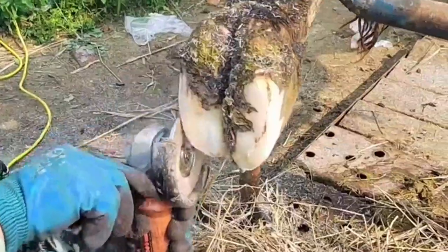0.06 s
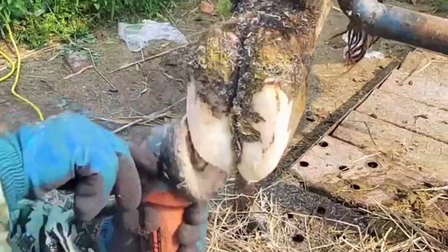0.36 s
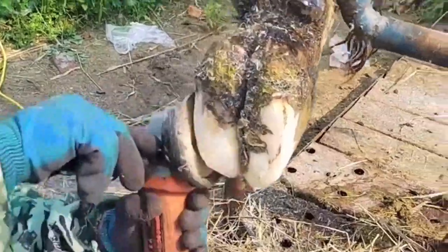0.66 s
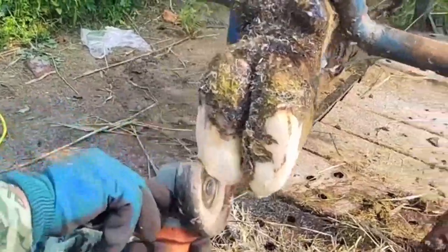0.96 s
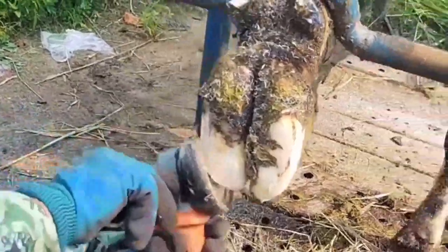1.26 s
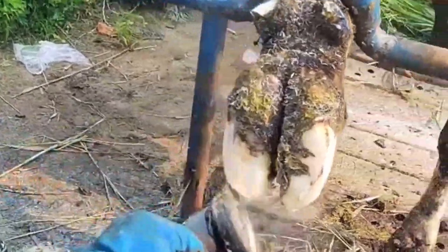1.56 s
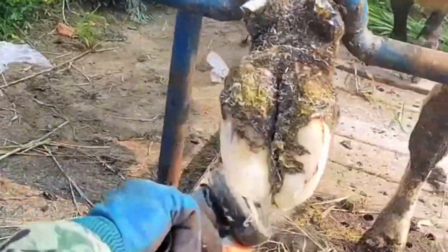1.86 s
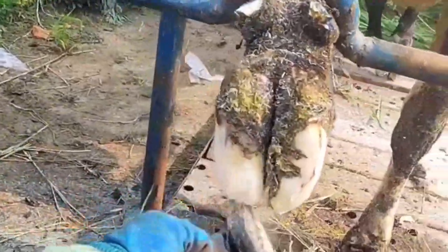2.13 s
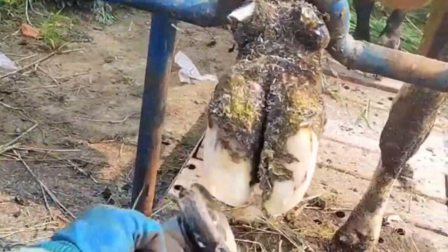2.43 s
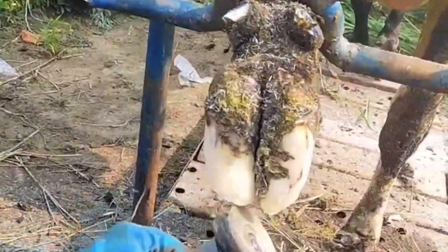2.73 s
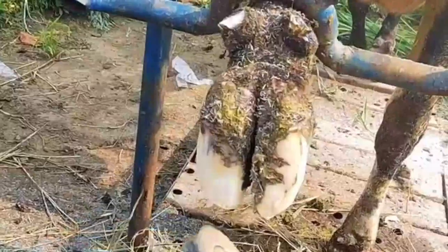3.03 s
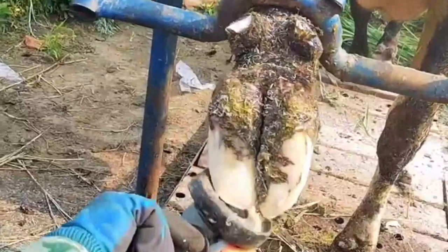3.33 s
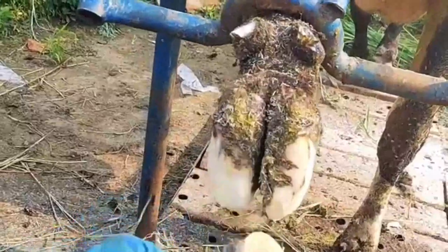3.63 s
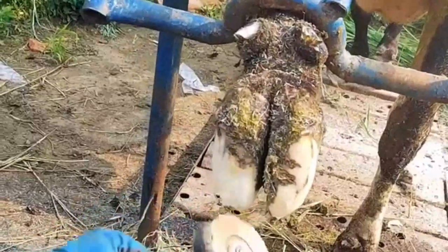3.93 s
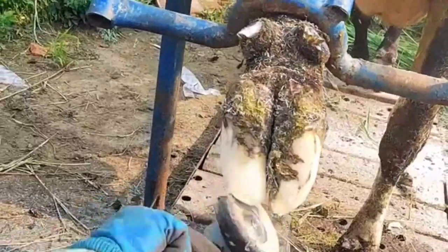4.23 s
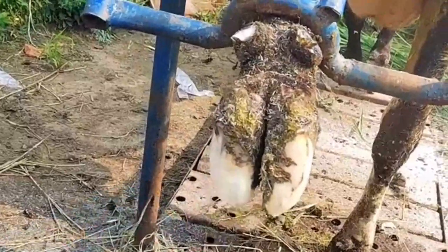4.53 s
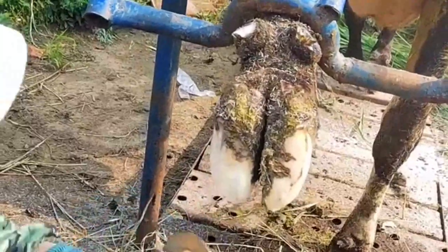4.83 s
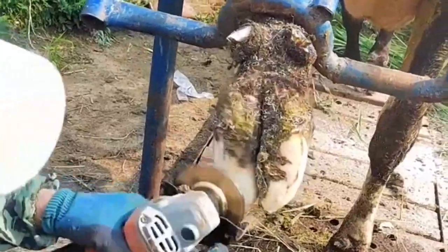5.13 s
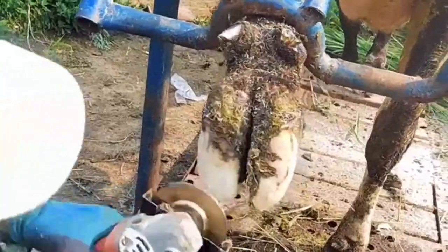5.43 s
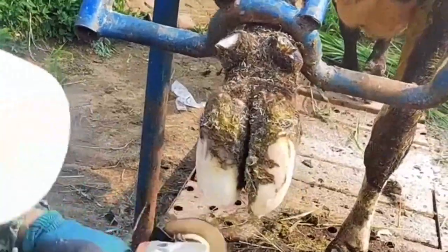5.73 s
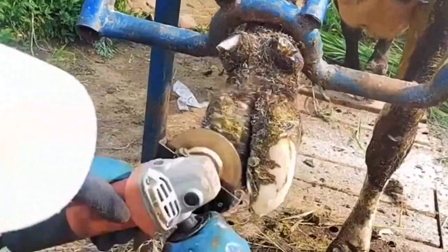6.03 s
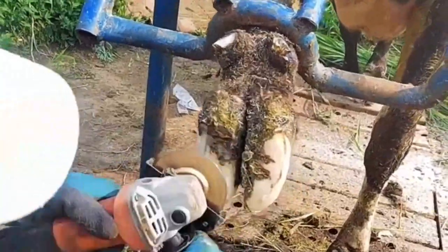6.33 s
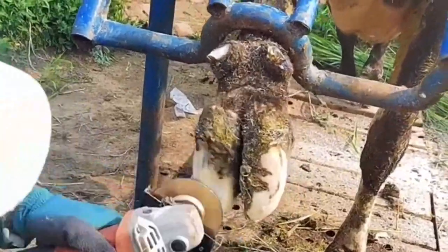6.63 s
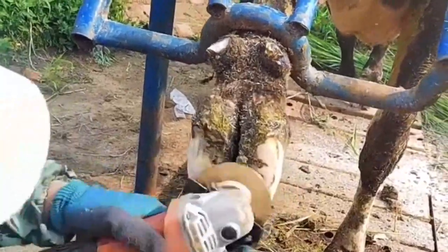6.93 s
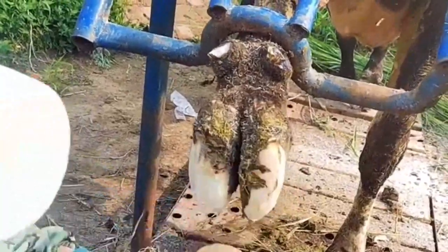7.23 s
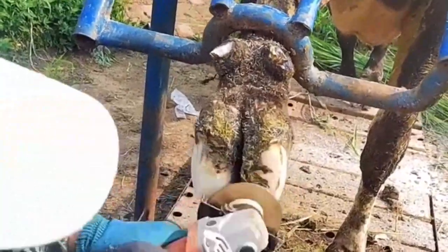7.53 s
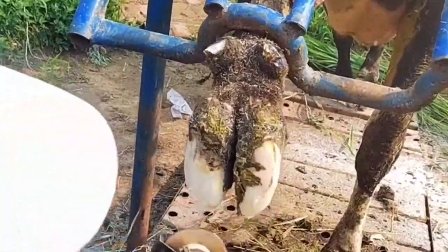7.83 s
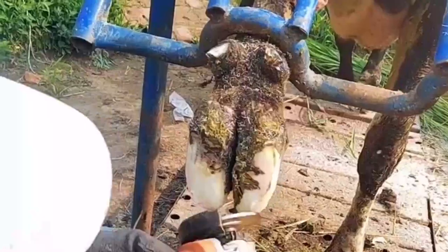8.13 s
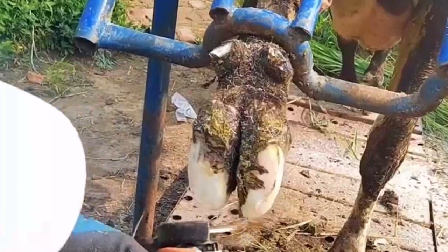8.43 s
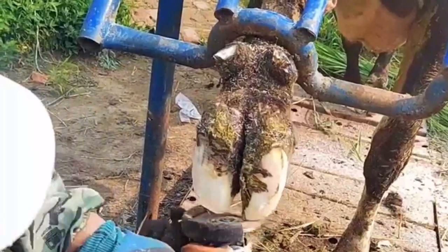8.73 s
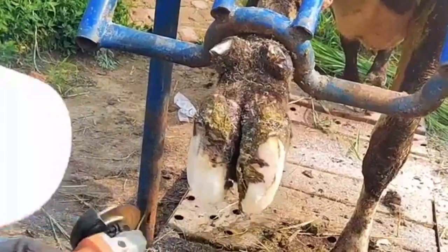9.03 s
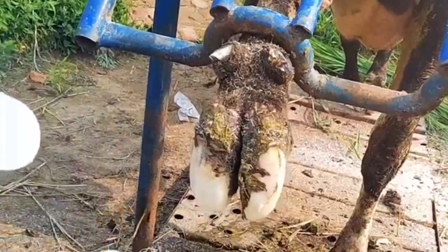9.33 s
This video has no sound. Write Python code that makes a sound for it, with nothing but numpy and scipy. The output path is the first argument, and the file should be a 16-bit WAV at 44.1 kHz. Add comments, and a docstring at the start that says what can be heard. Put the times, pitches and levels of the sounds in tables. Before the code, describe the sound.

Close to a single microphone in the open air, an angle grinder trims a cow's hoof without stopping. A grainy rasp and rushing fan carry a wavering motor whine that drops whenever the disc presses into the horn, bringing harsher gear rattle and hiss. Short metallic squeals come and go. Past the middle come thin, very high squeaks and several light knocks of breaking chips. There is no echo.

```python
"""An angle grinder with a toothed disc pares a cow's hoof, outdoors, close to a single microphone.
The teeth rasp and hiss through horn, and the motor sags at each bite and climbs as the disc lifts.
Its fan rushes and sings; its bevel gears rattle, and whine under load. Now and then the steel rim
sticks and squeals, or a hard chip tears off with a knock. The open air gives no echo."""
import sys
import numpy as np
from scipy import signal
from scipy.fft import rfft, irfft, next_fast_len
from scipy.io import wavfile
from scipy.ndimage import uniform_filter1d, map_coordinates

SR = 44100
rng = np.random.default_rng(int(sys.argv[2]) if len(sys.argv) > 2 else 0)


def log_audio(samples):
    """Write samples as a 16-bit WAV file to the path given in sys.argv[1]."""
    # one column per channel
    frames = np.atleast_2d(samples).T
    # limit to full scale, then quantise
    limited = np.clip(frames, -1, 1)
    pcm = np.round(limited * 32767).astype(np.int16)
    wavfile.write(sys.argv[1], SR, pcm)


N = 417186
TIME = np.arange(N) / SR
GEAR_RATIO, PINION_TEETH, ARMATURE_SLOTS = 3.6, 10, 12
MAINS_HZ = 50
TURN_OVER_S = 5.15  # the disc goes from working with its face to working with its edge

# The disc is pressed into the horn. Each row: start in seconds, length in seconds, dip of the
# recorded level in dB, extra gear rattle in dB, extra hiss in dB.
BITES = [(0.046, 0.17, 8, 1, -1), (0.451, 0.12, 7.5, 4, 2.5), (0.88, 0.12, 10.5, 12.5, 5.5),
         (1.035, 0.14, 3, 6, 0.5), (1.416, 0.21, 7, 13, 9), (1.926, 0.25, 5, 11, 4),
         (2.682, 0.16, 7, 8.5, 4), (3.548, 0.13, 9, 5, 4.5), (4.197, 0.28, 5, 5, 3.5),
         (5.13, 0.034, 9, -7, 9), (5.626, 0.21, 4, 6, 1), (6.055, 0.24, 5, 3.5, 3), (6.47, 0.17, 2.5, 2, 4),
         (7.081, 0.14, 4.5, 11, 4), (7.564, 0.12, 4.5, 9, 7), (8.14, 0.21, 3.5, 8.5, 1)]
# How the tool is held between bites. Each row: time in seconds, then base levels in dB of the
# rush of air and rasp, the gear rattle and the hiss of the cut.
GRIP = [(0, -21.5, -20.5, -23.5), (.8, -20.5, -21.5, -26), (1.35, -20, -22, -31), (2.4, -22, -19.5, -31),
        (3.3, -19.5, -25, -28), (4.5, -20.5, -21, -29.5), (5.1, -19.5, -24, -26), (5.25, -24.5, -19.5, -28),
        (6.3, -19.5, -22, -26), (6.75, -24, -23, -27.5), (6.77, -19, -20, -29.5), (7.1, -21.5, -21, -29),
        (7.9, -25.5, -18, -31), (8.2, -23, -21, -25.5), (8.65, -30, -17.5, -35.5),
        (9.05, -29.5, -18.5, -34), (9.46, -18.5, -28, -28.5)]
# Air and rasp with the disc on its face. Each row: frequency in Hz, spectral level in dB.
FACE_SPECTRUM = [(200, -20.5), (300, -5.5), (620, -6.5), (900, -1), (1550, -1), (2200, 4), (3000, 4),
                 (3800, 2), (6300, -6), (12000, -15)]
# Air and rasp with the disc on its edge. Each row: frequency in Hz, spectral level in dB.
EDGE_SPECTRUM = [(210, -18), (400, -9), (800, -0.5), (1700, 0.5), (2800, 3.5), (3600, -2), (6300, -8.5),
                 (12000, -18)]
# The rasp's upper band. Each row: time in seconds, lift in dB.
UPPER_RASP = [(.8, -5), (1.5, 2.5), (3.4, 3), (3.9, -1), (6.2, -2), (7.5, 1.5), (8.6, 0.5)]
# The hiss of the cut. Each row: frequency in Hz, spectral level in dB.
HISS_SPECTRUM = [(2000, -8), (4000, 0.5), (6500, 9.5), (8300, 4.5), (10400, 8.5), (11200, 1.5),
                 (15700, -0.5)]
# The armature sags under the cut and recovers. Each row: time in seconds, turns per second.
ARMATURE_SPEED = [(0.0, 541.0), (0.16, 523.0), (0.38, 536.0), (0.56, 501.0), (0.86, 526.0), (0.96, 488.0),
                  (1.12, 482.0), (1.26, 514.0), (1.46, 505.0), (1.64, 466.0), (1.88, 526.0), (1.98, 522.0),
                  (2.2, 468.0), (2.56, 536.0), (2.72, 520.0), (2.8, 499.0), (3.2, 559.0), (3.48, 551.0),
                  (3.64, 520.0), (4.02, 568.0), (4.22, 567.0), (4.38, 529.0), (4.84, 579.0), (5.14, 595.0),
                  (5.28, 522.0), (5.58, 559.0), (5.76, 493.0), (6.04, 546.0), (6.28, 463.0), (6.42, 495.0),
                  (6.74, 458.0), (6.92, 470.0), (7.06, 510.0), (7.15, 490.0), (7.23, 448.0), (7.46, 509.0),
                  (7.59, 527.0), (7.72, 450.0), (7.9, 510.0), (8.12, 535.0), (8.36, 496.0), (8.68, 545.0),
                  (8.88, 551.0), (8.96, 519.0), (9.06, 540.0), (9.46, 578.0)]
# The motor at the microphone as the tool turns in the hand. Each row: time in seconds, then base
# levels in dB of the fan tones, the slot whine and the unbalance hum.
MOTOR_LEVELS = [(0, -34, -44, -44), (.35, -19.5, -32, -52.5), (.6, -28, -27.5, -54),
                (1.3, -25.5, -22.5, -61), (2.4, -28.5, -37, -56), (3.3, -26, -23.5, -49),
                (4, -26.5, -29, -54.5), (5.1, -21, -31, -40), (5.22, -30, -33, -46.5),
                (7.15, -31, -36, -52.5), (7.33, -23, -36, -49), (8.7, -42, -29, -70), (9.46, -23, -29, -45)]
# The fan's tones. Each row: multiple of the armature speed, relative level in dB.
FAN_TONES = [(2, -9), (4, -0.5), (5, -6.5)]
# The motor's buzz under power. Each row: frequency in Hz, spectral level in dB.
BUZZ_SPECTRUM = [(1500, -4.5), (3000, 1), (4300, 14.5), (5200, -3), (8000, 10), (11000, -31), (12700, -15)]
# The crack of slack gear teeth. Each row: frequency in Hz, spectral level in dB.
CRACK_SPECTRUM = [(2000, -17), (4100, -7), (4700, -9), (5200, -4), (5800, 16), (6600, -2), (11500, -28),
                  (13000, 3), (15000, -18)]
# Modes of the steel disc. Each row: frequency in Hz, level of the steady ringing in dB.
DISC_MODES = [(2718, -32), (3262, -47), (5575, -32), (6424, -37), (8788, -50)]
# The rubbing rim locks onto one mode. Each row: peak time in seconds, row of DISC_MODES from 0,
# level in dB, half length in seconds.
SQUEALS = [(0.008, 1, -19.5, 0.08), (0.11, 3, -20, 0.059), (0.146, 4, -19, 0.059), (0.41, 3, -22, 0.14),
           (0.503, 2, -18, .025), (0.56, 0, -24, 0.091), (0.67, 1, -24, 0.044), (0.85, 0, -20, 0.039),
           (.90, 3, -19, 0.028), (0.957, 2, -13.5, 0.027), (0.987, 0, -29, 0.06), (1.286, 2, -16.5, 0.035),
           (1.51, 0, -22.5, 0.029), (2.156, 0, -17, 0.053), (2.76, 2, -14.5, 0.028),
           (3.598, 4, -22.5, 0.072), (3.603, 3, -14.5, 0.031), (4.29, 3, -14, 0.027),
           (4.358, 2, -16, 0.025), (5.21, 1, -26.5, 0.04), (6.155, 2, -21, 0.013), (6.252, 0, -17.5, 0.01),
           (6.32, 2, -25, 0.08), (6.35, 0, -25.5, 0.089), (6.495, 2, -19, 0.027), (8.36, 3, -22.5, 0.097),
           (8.88, 3, -13, 0.026), (8.886, 1, -24, 0.032), (8.964, 2, -18, 0.051)]
# Shrill resonances of the rim. Each row: frequency in Hz, relative level in dB.
RIM_MODES = [(7350, -6.5), (9000, -8.5)]
# Scrapes on hard horn. Each row: peak time in seconds, centre in Hz, level in dB,
# half length in seconds.
SCRAPES = [(.48, 9500, -20, 0.054), (.68, 8950, -19.5, 0.043), (1.61, 10400, -18.5, 0.011),
           (2.72, 9250, -21.5, 0.032), (4.83, 7440, -24, 0.21), (4.93, 11500, -28, 0.06),
           (4.95, 6260, -24, 0.13), (5.71, 9100, -21, 0.041), (6.3, 14800, -26, 0.054),
           (6.52, 15150, -21, 0.06), (6.86, 7260, -18.5, 0.047), (7.41, 7300, -25, 0.092)]
# The teeth chatter in a squawk. Each row: peak time in seconds, centre in Hz, level in dB,
# half length in seconds.
SQUAWKS = [(6.27, 4690, -19, 0.014), (6.72, 4030, -21, 0.029), (8.325, 5050, -16, 0.027)]
# The edge tears off a hard chip. Each row: start in seconds, centre in Hz, level in dB.
CHIPS = [(5.61, 1500, -16), (6.208, 1190, -16.5), (6.58, 1082, -16), (6.762, 1000, -22), (6.772, 2600, -11),
         (7.087, 1330, -15)]
# The hoof's hollow resonance shifts with the spot being cut. Each row: time in seconds,
# centre in Hz, relative level in dB.
HOOF_RESONANCE = [(0, 813, -8), (2.4, 814.3, -12.5), (3.2, 903, -24), (5.5, 965, -9.5)]
# Soft low bumps. Each row: peak time in seconds, centre in Hz, level in dB, half length in seconds.
BUMPS = [(.03, 120, -33.5, 0.037), (1.19, 225, -32, 0.073)]


def rasp(turns, spectrum, grain_db, chop_db):
    """Teeth tear off chips in fine uneven grains, harder on one side of each turn of the disc."""
    chop = np.sin(2 * np.pi * turns / GEAR_RATIO + 0.42 * walk(36))
    grains = noise() * undb(grain_db * walk(1500) + chop_db * chop + 1.24 * walk(60))
    return colour(grains, spectrum)


def horn_rasp(turns, upper_band_hz=(3350, 4500)):
    """The disc rasps with its face, then its edge; the upper band turns fuller or hollower."""
    face = rasp(turns, FACE_SPECTRUM, grain_db=2.0, chop_db=0.5)
    edge = rasp(turns, EDGE_SPECTRUM, grain_db=2.0, chop_db=0.5)
    body = undb(3.0) * np.where(TIME < TURN_OVER_S, face, edge)
    upper = signal.sosfilt(signal.butter(1, upper_band_hz, "bandpass", fs=SR, output="sos"), body)
    return body + (undb(curves(UPPER_RASP)[0]) - 1) * upper


def pressing(amounts_db, build_share, release_s):
    """Each bite builds to its own amount over a share of its length, holds, and lets go."""
    return sum(db * np.interp(TIME - s, [0, build_share * length, length, length + release_s],
                              [0, 1, 1, 0])
               for (s, length, *_), db in zip(BITES, amounts_db))


def gear_rattle(turns, pressure_db, gap_s=0.0073, ring_s=0.00035, scatter_db=4.5, rebound=0.81):
    """Slack teeth knock where throb, wobble and chance push hardest, and rebound one turn later."""
    push = 0.7 * (mains_throb() + np.sin(2 * np.pi * turns / GEAR_RATIO)) + walk(300)
    hits = signal.find_peaks(push, distance=1 + gap_s * SR)[0]
    rebounds = np.minimum(np.searchsorted(turns, turns[hits] + 1), N - 1)
    chance = np.clip(rng.standard_normal((len(hits), 2)), -2, 1).T
    knocks = np.zeros(N)
    knocks[hits] = undb(scatter_db * chance[0])
    knocks[rebounds] += rebound * undb(2 * scatter_db * chance[1])
    burst = signal.lfilter([1], [1, -np.exp(-1 / (ring_s * SR))], knocks)
    burst = unit(uniform_filter1d(burst, size=24))
    # pressing on the horn closes the slack, so the knocks merge into a scrape
    scrape = 0.32 * undb(0.26 * (pressure_db - np.median(pressure_db)))
    force = unit((burst + scrape) / np.hypot(1, scrape))
    # each knock is a crack and a chirp at the meshing pitch, drawn out by the gear head's resonance
    mesh = np.sin(2 * np.pi * PINION_TEETH * turns + 1.14 * walk(1000))
    chirps = resonate(force * mesh, centre_hz=5610, width_hz=3150)
    cracks = undb(-10) * force * colour(noise(), CRACK_SPECTRUM)
    return unit(chirps + cracks)


def gear_whine(turns, load, bite_db, full_bite_db=5.5):
    """The pinion sings harshly when a hard bite brakes the disc; each disc turn sways the pitch."""
    wobble = np.sin(2 * np.pi * turns / GEAR_RATIO)
    mesh = np.sin(2 * np.pi * PINION_TEETH * turns + 0.8 * wobble + 0.9 * walk(700))
    braking = load * np.clip(bite_db / full_bite_db, 0, 1)
    return unit(mesh * undb(2.8 * walk(200))) * undb(-22 + 14 * braking ** 2)


def motor(turns, speed, pull, load, rush_db, fan_db, slot_db, housing_hz=3000):
    """Fan tones and the rough whine of the armature slots, shaken by the throbbing torque."""
    throb = mains_throb()
    angle = 2 * np.pi * turns + 0.013 * throb + 0.019 * walk(120)
    flutter = 0.082 * walk(150)
    fan = sum(undb(db + 2.9 * walk(9) + 3.0 * walk(70)) * np.sin(multiple * angle + flutter)
              for multiple, db in FAN_TONES)
    slots = undb(2.4 * walk(130) + 2.0 * throb) * np.sin(ARMATURE_SLOTS * angle + 0.31 * walk(450))
    tones = undb(fan_db - 5 + 1.6 * pull) * fan + undb(slot_db) * slots
    choke = undb(-8 * load ** 2)  # a hard bite chokes both
    # drawing current, the motor sings an octave under the slots, loudest near the housing's resonance
    housing = 1 / np.hypot(1, (ARMATURE_SLOTS / 2 * speed - housing_hz) / 230)
    strain = undb(rush_db - 14 + 8.1 * pull) * housing * np.sin(ARMATURE_SLOTS / 2 * angle)
    return np.sqrt(2) * (choke * tones + strain)


def mains_throb():
    """The torque throbs at twice the mains rate."""
    return np.sin(2 * np.pi * 2 * MAINS_HZ * TIME)


def power_buzz(pull, rush_db, sharpness=5, face_db=-5.0, edge_db=-12):
    """While the motor pulls hard, brushes and gears crackle at every crest of the mains current."""
    crest = np.exp(sharpness * (mains_throb() - 1))
    crackle = colour(noise() * crest * undb(2 * walk(60)), BUZZ_SPECTRUM)
    heard_db = rush_db + np.where(TIME < TURN_OVER_S, face_db, edge_db)
    return undb(heard_db) * np.sqrt(pull) * crackle


def squeals(tail=0.042, waver_hz=14, flutter_db=3.5):
    """Stick and slip at the rim drives one mode into a nearly pure, wavering tone that lingers."""
    waver = 2 * np.pi * np.cumsum(waver_hz * walk(130)) / SR
    flutter = np.sqrt(2) * undb(flutter_db * np.clip(walk(90), -2, 1))
    tones = np.zeros(N)
    for peak_s, mode, db, half_s in SQUEALS:
        envelope = swell(peak_s, db, half_s) + tail * swell(peak_s + half_s, db, 3 * half_s)
        tones += envelope * np.sin(2 * np.pi * DISC_MODES[round(mode)][0] * TIME + waver)
    return flutter * tones


def rim_chirps(spread_db=7.5, width_hz=650):
    """Each resonance of the rim flares up briefly on its own as the contact point wanders."""
    chirps = np.zeros(N)
    for hz, db in RIM_MODES:
        flare = undb(spread_db * np.clip(walk(16), -2, 2))
        chirps += undb(db) * unit(flare * resonate(noise(), hz, width_hz))
    return chirps


def edge_squeaks(centre_hz=14700, width_hz=1100, spread_db=8):
    """Worked on its edge, the disc gives very high squeaks that come and go."""
    flare = undb(spread_db * np.clip(walk(14), -2, 2))
    return undb(-7) * (TIME > TURN_OVER_S) * unit(flare * resonate(noise(), centre_hz, width_hz))


def noise_swells(table, width_share, flicker_db):
    """Scrapes, squawks or bumps: flickering noise swells in a band as wide as a share of its centre."""
    source = noise() * undb(flicker_db * walk(150))
    return sum(swell(peak_s, db, half_s) * resonate(source, hz, width_share * hz)
               for peak_s, hz, db, half_s in table)


def chip_knocks(decay_s=0.0087, width_share=0.67):
    """Each torn chip rings the hoof at once and dies away."""
    knocks = np.zeros(N)
    for start_s, hz, db in CHIPS:
        envelope = (TIME >= start_s) * np.exp(-np.abs(TIME - start_s) / decay_s)
        knocks += undb(db) * envelope * resonate(noise(), hz, width_share * hz)
    return knocks


def disc_ring(width_hz=46):
    """The teeth keep all the disc's modes faintly ringing."""
    return sum(undb(db + 2 * walk(19)) * resonate(noise(), hz, width_hz) for hz, db in DISC_MODES)


def hoof_ring(width_hz=200):
    """The rasping keeps the hoof humming in one broad, moving resonance."""
    hz, db = curves(HOOF_RESONANCE)
    angle = 2 * np.pi * np.cumsum(hz) / SR
    return undb(db) * unit(walk(width_hz) * np.sin(angle) + walk(width_hz) * np.cos(angle))


def unbalance(turns, db, jitter_rad, jitter_rate):
    """A rotor a little out of balance hums at its turning rate, low beneath the cut."""
    return undb(db) * unit(np.sin(2 * np.pi * turns + jitter_rad * walk(jitter_rate)))


def undb(db):
    """Decibels to gain."""
    return 10 ** (np.asarray(db) / 20)


def unit(x):
    """Scale to rms 1."""
    return x / np.sqrt(np.mean(x ** 2))


def curves(table):
    """Each column after the first as a line through time."""
    seconds, *columns = np.transpose(table)
    return [np.interp(TIME, seconds, column) for column in columns]


def noise():
    """White noise."""
    return rng.standard_normal(N)


def walk(rate):
    """Smooth chance that changes about rate times a second; rms 1."""
    steps = rng.standard_normal(N // 8)
    return unit(map_coordinates(steps, [TIME * rate], order=1, mode="wrap"))


def shape(x, gain):
    """Filter by a gain that is a function of frequency; rms 1."""
    size = next_fast_len(N)
    hz = np.arange(size // 2 + 1) * SR / size + 1e-3
    return unit(irfft(rfft(x, size) * gain(hz), size)[:N])


def colour(x, points):
    """Filter by a curve of (Hz, dB) points."""
    points_hz, db = np.transpose(points)
    return shape(x, lambda hz: undb(np.interp(np.log(hz), np.log(points_hz), db)))


def resonate(x, centre_hz, width_hz):
    """One resonance with steep skirts."""
    return shape(x, lambda hz: 1 / (1 + 1j * (hz ** 2 - centre_hz ** 2) / (hz * width_hz)) ** 2)


def swell(peak_s, db, half_s):
    """A rounded rise and fall around one moment."""
    return undb(db) / np.cosh(np.clip(1.47 * (TIME - peak_s) / half_s, -30, 30))


def scene():
    """The grinder at close range in open air, on one microphone."""
    rush_db, rattle_db, hiss_db = curves(GRIP)
    fan_db, slot_db, hum_db = curves(MOTOR_LEVELS)
    # a bite brings out gears and cut; the recorded level ducks at each bite and swells back
    _, _, dips, rattles, hisses = np.transpose(BITES)
    bite_db = pressing(rattles, build_share=0.4, release_s=0.049)
    rattle_db += bite_db
    hiss_db += pressing(hisses, build_share=0.2, release_s=0.048)
    dip_db = pressing(dips, build_share=0.84, release_s=0.14)
    speed = uniform_filter1d(curves(ARMATURE_SPEED)[0], size=1500)
    turns = np.cumsum(speed) / SR
    climb = uniform_filter1d(np.gradient(speed) * SR, size=2500)
    load = np.clip(-climb / 190, 0, 1)  # the faster the motor slows, the harder the disc bites
    pull = np.clip(climb / 220, 0, 1)  # the faster it climbs, the harder it pulls

    disc_hum = unbalance(turns / GEAR_RATIO, hum_db, jitter_rad=0.5, jitter_rate=40)
    armature_hum = unbalance(turns, rush_db - 23 + walk(7.7), jitter_rad=0.14, jitter_rate=56)
    body = horn_rasp(turns) + hoof_ring()
    gears = undb(-3.5 * load) * gear_rattle(turns, rush_db + bite_db) + gear_whine(turns, load, bite_db)
    hiss = undb(4.5) * rasp(turns, HISS_SPECTRUM, grain_db=2.5, chop_db=-1.0)
    cut = hiss + rim_chirps() + edge_squeaks()
    tool = undb(rush_db) * body + undb(rattle_db) * gears + undb(hiss_db) * cut
    tool += power_buzz(pull, rush_db) + disc_hum
    drive = motor(turns, speed, pull, load, rush_db, fan_db - dip_db, slot_db - 0.27 * dip_db)
    steel = disc_ring() + squeals()
    steel += noise_swells(SCRAPES, width_share=0.12, flicker_db=3)
    steel += noise_swells(SQUAWKS, width_share=0.028, flicker_db=3)
    bumps = noise_swells(BUMPS, width_share=1.5, flicker_db=0.5)
    return (undb(-dip_db) * tool + drive + steel + chip_knocks() + armature_hum + bumps)[None]


def record(dry):
    """The recorder rounds the tallest peaks and cuts the top."""
    top_hz = 15750
    return signal.sosfilt(signal.ellip(10, .2, 80, top_hz, fs=SR, output="sos"), np.tanh(dry))


dry = scene()
out = record(dry)
log_audio(out)
```